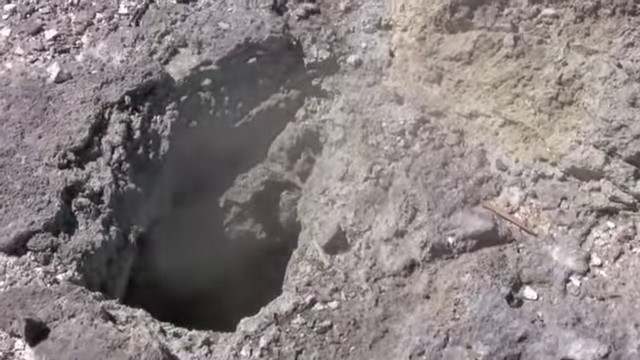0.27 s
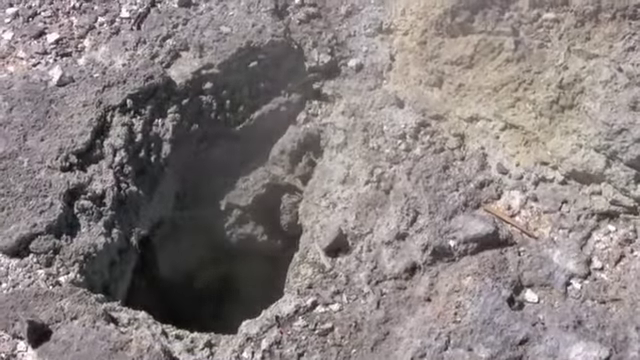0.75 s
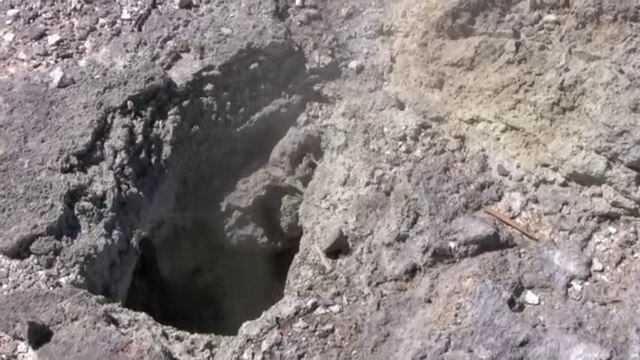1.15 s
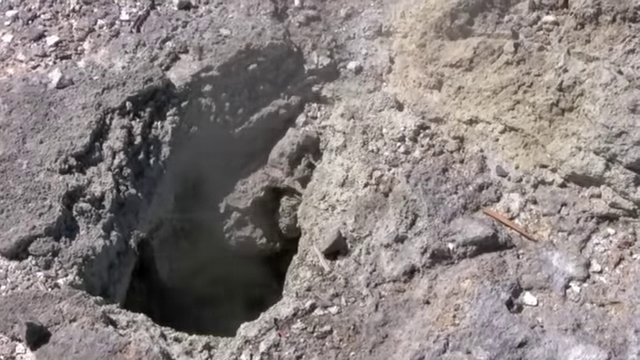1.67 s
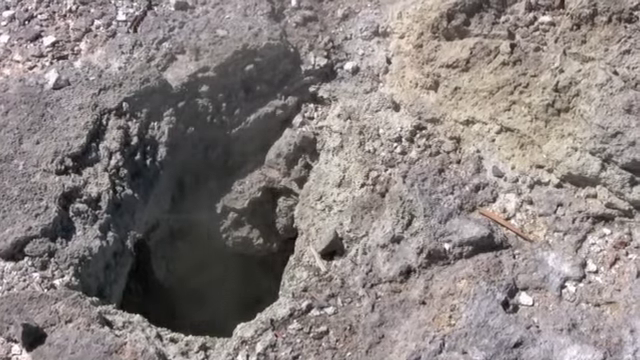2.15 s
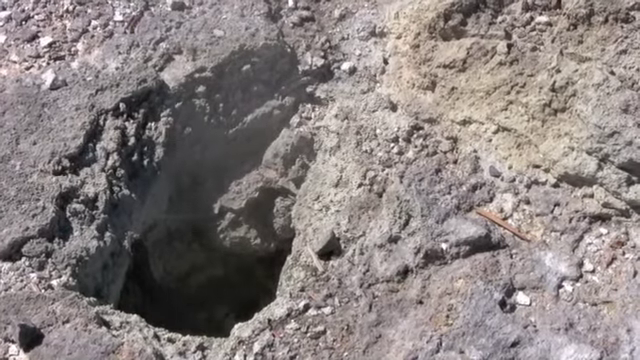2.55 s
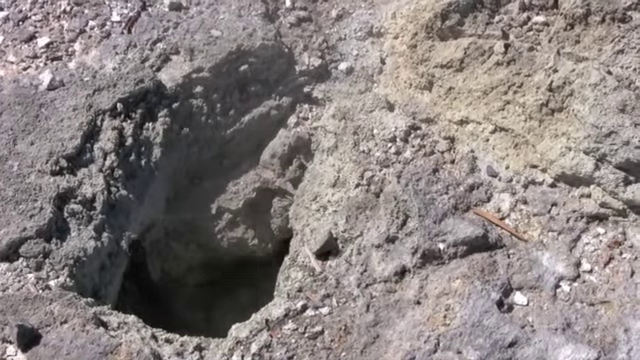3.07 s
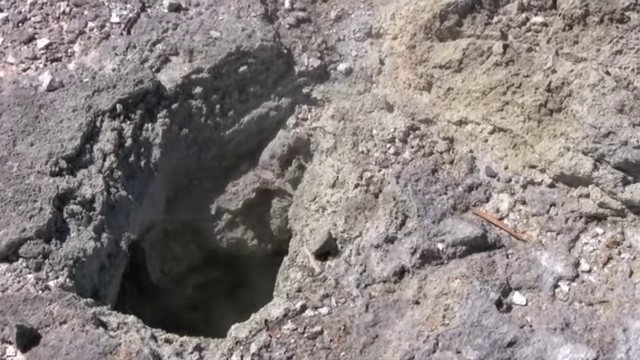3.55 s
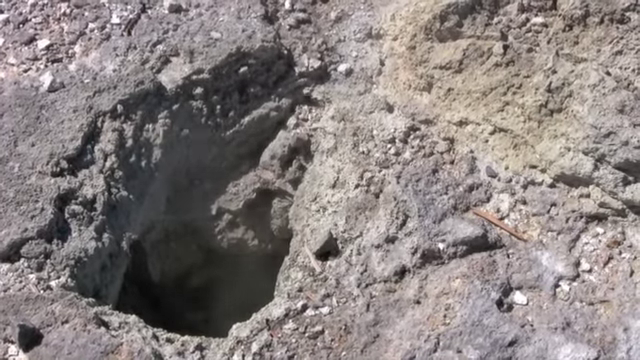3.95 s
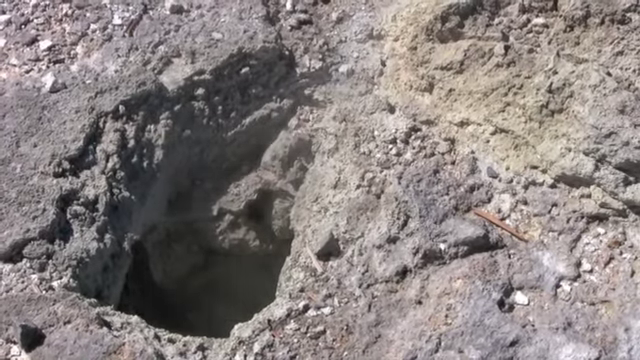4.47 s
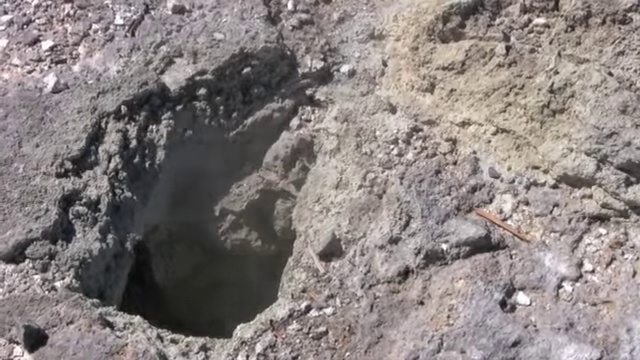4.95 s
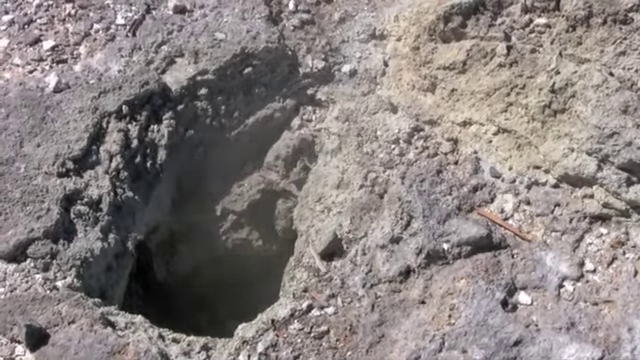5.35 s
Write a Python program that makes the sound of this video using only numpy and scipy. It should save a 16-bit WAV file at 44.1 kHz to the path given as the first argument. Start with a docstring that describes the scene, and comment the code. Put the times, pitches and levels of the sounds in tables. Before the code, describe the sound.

Hot muddy water boils deep in a small ground vent, with irregular hollow plops, low gulps and tiny wet pops over a soft simmer.

```python
"""At the rim of a small geothermal vent outdoors, hot muddy water is heard boiling at the bottom.
Gas pockets gulp and whoop, made of swelling sine tones; bubbles plop and pop in clusters with froth and drops.
Splashes throw noisy spray; many small bubbles simmer over a deep blur, under a faint hiss of filtered noise.
The throat rings and the rock echoes; the camera adds a knock, a thin whine and short lens motor buzzes."""
import sys
import numpy as np
from scipy import signal
from scipy.fft import rfft, irfft
from scipy.io import wavfile
from scipy.ndimage import uniform_filter1d

SR = 44100
rng = np.random.default_rng(int(sys.argv[2]) if len(sys.argv) > 2 else 0)


def file_out(sig):
    """Save sig as 16-bit WAV at sys.argv[1]."""
    # one column per channel
    cols = np.atleast_2d(sig).T
    # limit, then scale
    lim = np.clip(cols, -1, 1)
    pcm = np.round(lim * 32767).astype(np.int16)
    wavfile.write(sys.argv[1], SR, pcm)


N = 247401
TIME = np.arange(N) / SR


def gain_of(db):
    """Turns decibels into amplitude."""
    return 10 ** (np.asarray(db) / 20)


def evened(x):
    """Scales a signal to an rms level of 1."""
    return x / np.sqrt(np.mean(x ** 2) + 1e-20)


def read_curve(points, hz):
    """Joins (pitch [Hz], value) points with straight lines on a log-frequency axis."""
    f, value = np.transpose(points)
    return np.interp(np.log(hz + 1), np.log(f + 1), value)


def add(mix, s, sound):
    """Mixes a sound in, starting at time s."""
    part = mix[max(0, round(s * SR)):][:len(sound)]
    part += sound[:len(part)]


def bubble(hz, swell, glide, delay=0):
    """A pocket of gas rings for a few cycles, swelling and dying; its pitch climbs as it surfaces."""
    t = np.maximum(np.arange(int(8 * swell * SR) + 2) / SR - delay, 0)
    u = t / swell  # 1 at the loudest moment, where the pitch is exactly hz
    envelope = (u * np.exp(1 - u)) ** 2
    return envelope * np.sin(2 * np.pi * hz * t * (1 + glide * (u - 2)))


def bubbles(rows, glide):
    """Plays bubbles given as (time [s], level [dB], pitch [Hz], swell time [s])."""
    out = np.zeros(N)
    for s, db, hz, swell in rows:
        start = np.floor(s * SR) / SR
        delay = s - start  # the part of a sample left over
        add(out, start, gain_of(db) * bubble(hz, max(swell, 10 / SR), glide, delay))
    return out


def swarm(per_s, low_hz, high_hz, cycles, spread_db, tilt_db=0, count=40):
    """Countless bubbles of many sizes, each size arriving at random; tilt in dB per octave."""
    out = np.zeros(N)
    for hz in np.geomspace(low_hz, high_hz, count):
        chance, size = rng.random(N), rng.standard_normal(N)
        swell = cycles * rng.uniform(0.22, 1.87) / hz
        ring = gain_of(tilt_db * np.log2(hz / low_hz)) * bubble(hz, swell, 0.012)
        for k in np.flatnonzero(chance < per_s / count / SR):
            add(out, k / SR, gain_of(spread_db * min(size[k], 2)) * ring)
    return evened(out)


def noise(colour, likeness, patchy_db):
    """Stereo noise: random waves shaped by a colour curve, with patches that drift in time and pitch."""
    hz = np.fft.rfftfreq(2048, 1 / SR)
    a, b, c, d, patches = rng.standard_normal((5, len(hz), N // 512 + 5))
    patches = uniform_filter1d(patches, size=12, axis=0)
    patches = evened(uniform_filter1d(patches, size=4, axis=1))
    same = np.clip(read_curve(likeness, hz), -1, 1)[:, None]
    left = a + 1j * b
    right = same * left + np.sqrt(1 - same ** 2) * (c + 1j * d)
    spectrum = np.array([left, right])
    spectrum *= gain_of(read_curve(colour, hz)[:, None] + patchy_db * patches)
    return evened(signal.istft(spectrum, nperseg=2048, noverlap=1536)[1][:, :N])


# how hard the water boils, only lightly followed by the sound: (time [s], vigour [dB])
VIGOUR = [(0.0, -36.5), (0.94, -33), (1.05, -14), (1.4, -32), (2.08, -25.5), (3.05, -30.5), (3.5, -25),
          (3.88, -30), (4.97, -17), (5.61, -38.5)]


def boil_strength(follow=0.12):
    """The boil grows louder and softer by a small share of its vigour in dB."""
    s, db = np.transpose(VIGOUR)
    return gain_of(follow * np.interp(TIME, s, db - np.median(db)))


def simmer():
    """The steady boil: many small bubbles ring at random as low murmurs, plops and fizz."""
    murmur = gain_of(-53) * swarm(per_s=110, low_hz=142.3, high_hz=246, cycles=1.73, spread_db=1.0)
    bubbling = gain_of(-50) * swarm(per_s=300, low_hz=300, high_hz=680, cycles=1.3, spread_db=3.3)
    small = gain_of(-57) * swarm(per_s=400, low_hz=727, high_hz=1155, cycles=1.65, spread_db=2.5)
    fizz = gain_of(-63.5) * swarm(per_s=500, low_hz=1170, high_hz=2900, cycles=2.2, spread_db=3.5, tilt_db=-6)
    return murmur + bubbling + small + fizz


# tone of the deep blur: (pitch [Hz], relative level per Hz [dB])
WASH_COLOUR = [(15, -50), (28, -36), (40, -13), (80, -5), (130, -2), (190, 0), (280, -0.5), (470, -5.5),
               (750, -10), (1100, -12.5), (1500, -24.5), (2300, -27.5), (3500, -43.5), (8000, -47)]
# how alike the blur is at the two ears: (pitch [Hz], left-right correlation [-1 to 1])
WASH_LIKENESS = [(30, 0.34), (130, 0.62), (600, 0.76), (1400, 0.39), (3000, 0.46)]


def deep_wash():
    """Deep boiling blurs into low, patchy noise."""
    return gain_of(-44) * noise(WASH_COLOUR, WASH_LIKENESS, patchy_db=2.5)


# tone of the hiss: (pitch [Hz], relative level per Hz [dB])
HISS_COLOUR = [(300, -46), (1500, -7), (3500, 6.5), (5000, 2.5), (6200, 5), (8500, 2.5), (9400, 6),
               (10200, 2), (12000, 4.5), (14000, -14), (16000, -42)]
# how alike the hiss is at the two ears: (pitch [Hz], left-right correlation [-1 to 1])
HISS_LIKENESS = [(1500, -0.32), (3500, 0.3), (6000, 0.36), (9000, -0.3), (15000, -0.62)]


def faint_hiss():
    """A faint, patchy hiss of noise lies over the boil, slightly louder on the right."""
    return gain_of(-61) * noise(HISS_COLOUR, HISS_LIKENESS, patchy_db=3.0) * gain_of([[-.7], [.7]])


# short spells of the lens motor: (time at the centre [s], half length [s])
MOTOR_SPELLS = [(.05, .068), (.9, .03), (1.323, .03), (2.11, .1), (2.65, .04), (3.197, .045), (4.177, .074),
                (5.3, .08)]
# how strongly the motor buzzes at each pitch: (pitch [Hz], relative level [dB])
MOTOR_COLOUR = [(3500, -18), (4200, -9), (4700, 2), (5100, -20), (5400, -30), (6000, -0.5), (6300, -2),
                (6800, -42), (7800, -7), (9000, -20), (11200, -15), (12500, -27)]


def lens_motor(level_db=-66, step_hz=300):
    """A stepping motor buzzes on whole multiples of its step rate, in short smooth-edged spells."""
    buzz = np.zeros(N)
    for hz in np.arange(12, 41) * step_hz:
        buzz += gain_of(read_curve(MOTOR_COLOUR, hz)) * np.sin(2 * np.pi * (hz * TIME + rng.random()))
    running = np.zeros(N)
    for s, half in MOTOR_SPELLS:
        running += 1 / (1 + ((TIME - s) / half) ** 8)
    return gain_of(level_db) * running * evened(buzz) * np.ones((2, 1))


# thin tones of the camera: (pitch [Hz], rms level [dB], phase of left ahead of right [radians])
WHINE_TONES = [(3585, -79, .5), (4490, -83, 1), (4680, -80, 1.8), (4800, -80, 2), (5243, -81, 1),
               (5383, -79, 1), (6002, -83, 1), (7187, -84, 1), (9265, -80, 2.2), (9362, -74, 2.3),
               (9458, -79, 2.4), (10550, -81, 2.8), (11700, -81, 2.8)]


def camera_whine(waver_hz=4):
    """Faint steady tones waver slightly in pitch, at a different phase in each ear."""
    out = np.zeros((2, N))
    for hz, db, phase in WHINE_TONES:
        waver = waver_hz * evened(uniform_filter1d(rng.standard_normal(N), size=2000))
        turns = np.cumsum(hz + waver) / SR
        out += gain_of(db) * np.sqrt(2) * np.sin(2 * np.pi * turns + np.array([[phase], [0]]))
    return out


# bubbles opening at the surface, alone or in quick clusters:
# (time [s], level before the mix [dB], pitch [Hz], swell time [s])
PLOP_BUBBLES = [(.087, -33.5, 404, 0.0031), (0.4137, -23, 443, 0.0017), (.423, -38, 630, 0.0053),
                (0.4377, -24, 630, 0.003), (0.45, -27, 427, 0.0017), (.461, -27, 557, 0.0021),
                (0.4696, -13.5, 566, 0.0042), (.472, -20.5, 785, 0.0027), (.478, -13.5, 616, 0.0016),
                (.481, -20, 850, 0.0026), (.5207, -31, 463, 0.0015), (0.6482, -31.5, 544, 0.0026),
                (0.7107, -33.5, 790, 0.0016), (.831, -35.5, 620, 0.0026), (0.8778, -28, 550, 0.0011),
                (1.041, -40, 1070, 0.0016), (1.0865, -28, 560, 0.0031), (1.096, -29, 930, 0.0013),
                (1.11, -31, 810, 0.001), (1.347, -28.5, 345, 0.0041), (1.361, -40, 630, 0.0059),
                (1.721, -32.5, 536, 0.0024), (1.7474, -17.5, 640, 0.002), (1.761, -21.5, 560, 0.0032),
                (1.918, -30, 516, 0.0027), (1.945, -24, 475, 0.0018), (1.9605, -22.5, 610, 0.0032),
                (1.968, -20.5, 392, 0.0044), (1.969, -35, 870, 0.0024), (1.984, -28, 460, 0.0024),
                (1.994, -16.5, 520, 0.0025), (1.999, -32, 750, 0.0018), (2.006, -21, 566, 0.003),
                (2.0138, -16.5, 610, 0.0026), (2.021, -39, 720, .002), (2.039, -31, 550, 0.00083),
                (2.143, -35, 680, 0.0018), (2.306, -32, 550, 0.0022), (2.546, -23, 590, 0.002),
                (2.557, -24, 610, 0.0025), (2.556, -40, 837, 0.0063), (3.267, -26.5, 343, 0.0052),
                (3.268, -36, 830, .0015), (3.277, -25, 516, 0.0033), (3.291, -32, 554, 0.0042),
                (3.2972, -21, 560, 0.0016), (3.305, -26, 590, 0.0014), (3.332, -29.5, 490, 0.0016),
                (3.472, -27, 419, 0.0058), (3.4755, -31, 706, 0.0022), (3.483, -25.5, 605, 0.0026),
                (3.4997, -20, 580, 0.0026), (3.5195, -30.5, 634, 0.0021), (3.5448, -26.5, 770, 0.00077),
                (3.578, -37.5, 644, 0.0032), (4.089, -38.5, 1090, 0.0021), (4.1241, -24.5, 358, 0.0024),
                (4.281, -24, 483, 0.0025), (4.7324, -35, 620, 0.003), (4.7971, -26, 656, 0.002),
                (4.871, -24.5, 584, .004), (4.88, -25.5, 633, 0.0045), (4.8961, -17, 470, 0.0024),
                (4.8975, -17.5, 645, 0.0059), (4.903, -17.5, 361, 0.0033), (4.905, -17.5, 750, 0.0023),
                (4.9135, -13, 516, 0.0025), (4.924, -22, 565, 0.0038), (4.929, -24, 820, 0.0031),
                (4.937, -30.5, 1045, 0.0037), (4.948, -23.5, 806, 0.0024), (4.96, -21.5, 567, 0.00092),
                (4.965, -39, 786, 0.0017), (5.025, -30.5, 520, 0.0038), (5.0518, -27, 417, 0.0012),
                (5.147, -34.5, 464, 0.0054)]


def plopping(overtone=1.2, overtone_db=-14):
    """Each opening bubble sounds its pitch and one weaker, higher partial."""
    overtones = [(s, db + overtone_db, hz * overtone, swell) for s, db, hz, swell in PLOP_BUBBLES]
    return bubbles(PLOP_BUBBLES + overtones, glide=0.0061)


def froth(bursts, level_db=-20, settle_s=0.024):
    """Each burst tears off smaller bubbles, which die away just after it."""
    keep = np.exp(-1 / (settle_s * SR))
    stir = np.sqrt(signal.lfilter([1 - keep], [1, -keep], bursts ** 2))  # loudness that lingers
    return gain_of(level_db) * stir * swarm(per_s=560, low_hz=404, high_hz=1294, cycles=7.2, spread_db=2.5)


# large gas pockets swelling under the surface: (time [s], level [dB], pitch [Hz], swell time [s])
GULP_POCKETS = [(.1057, -30.5, 236, 0.0054), (.392, -24.5, 201, 0.0085), (.416, -25, 180.4, 0.014),
                (.436, -19.5, 204, 0.0037), (.447, -19, 191.3, 0.0085), (.47, -26, 225, 0.0024),
                (.49, -23.5, 227, 0.0032), (.52, -32.5, 162, 0.0096), (.85, -31.5, 225, 0.0035),
                (1.044, -27, 175, 0.011), (1.096, -29, 198, 0.0083), (1.7088, -26.5, 190, 0.0033),
                (1.748, -29.5, 220, 0.012), (1.942, -14, 165, .0047), (1.959, -20, 185, 0.0043),
                (1.975, -20, 211, 0.0077), (1.992, -30, 210, .006), (2.038, -29, 186, 0.0045),
                (2.267, -28, 210, 0.0052), (2.553, -30, 180, 0.0079), (2.741, -24.5, 193, 0.0068),
                (2.828, -26.5, 260, 0.0021), (2.952, -32.5, 204, 0.011), (3.166, -28, 190, 0.0032),
                (3.2048, -28, 215, 0.0072), (3.266, -21.5, 201, 0.011), (3.287, -29.5, 170, 0.01),
                (3.47, -19, 210, 0.0049), (3.518, -31, 195, 0.011), (3.541, -24.5, 197, 0.0094),
                (4.219, -32, 185, 0.0065), (4.2537, -25, 188, 0.0078), (4.551, -28.5, 178, 0.0078),
                (4.616, -33.5, 207, 0.01), (4.6365, -26, 208, 0.0044), (4.875, -25.5, 182, 0.011),
                (4.896, -13, 205.5, 0.0063), (4.912, -20, 213, 0.0039), (4.924, -26.5, 172, 0.011),
                (4.954, -26, 177, 0.0089), (5.021, -29.5, 225, 0.0062), (5.049, -33, 190.5, 0.012),
                (5.588, -24.5, 210, 0.0086)]


def gulping(shove_db=-8, shove_hz=220, shove_swell_s=0.0034):
    """Low gulps: pockets on their own, and a soft one where each plop shoves the gas beneath it."""
    shoved = []
    for s, db, *_ in PLOP_BUBBLES:
        hz = shove_hz * rng.uniform(0.49, 1.62)
        shoved.append((s, db + shove_db, hz, shove_swell_s))
    return bubbles(GULP_POCKETS + shoved, glide=0.0026)


# air tones of the vent's throat: (pitch [Hz], relative level [dB], time to fade by 60 dB [s])
THROAT_MODES = [(201, 5, 0.099), (370, -3, 0.045), (522, 1, 0.065), (660, -6, 0.05), (855, -5, 0.08),
                (1130, -10, 0.04)]


def throat(x, ring_db=-13):
    """The air in the hole rings on after each bubble, on a few fading tones."""
    t = np.arange(SR // 4) / SR
    ring = np.zeros(len(t))
    for hz, db, t60 in THROAT_MODES:
        ring += gain_of(db - 60 * t / t60) * np.sin(2 * np.pi * hz * t)
    ring /= abs(rfft(ring)).max()  # the strongest tone has a gain of 1
    return gain_of(ring_db) * signal.oaconvolve(x, ring)[:N]


def walls(x, t60):
    """Quick scattered echoes from the rough rock; they all leave by the one opening."""
    t = np.arange(SR // 5) / SR
    bounces = rng.standard_normal(len(t)) * (rng.random(len(t)) < .1) * (t > .002)
    taps = bounces * gain_of(-60 * t / t60)
    return signal.oaconvolve(x, taps / np.linalg.norm(taps))[:N]


# ringing tones of a light knock on the camera body:
# (pitch [Hz], level before rise and panning [dB], time to fade by 60 dB [s], left minus right [dB])
KNOCK_TONES = [(1130, -10.5, 0.016, 6), (1260, -19, 0.01, -15), (1820, -20, 0.0089, -2),
               (2150, -21, 0.0099, -11), (2930, -29, 0.014, -6), (3300, -48, 0.06, 4),
               (2400, -33.5, 0.082, -12), (2480, -27, 0.0042, -9), (4080, -24.5, 0.0071, -2),
               (4370, -27.5, 0.0076, -7), (6750, -32, 0.0058, -6), (10200, -25.5, 0.0038, -5),
               (13000, -35, .004, 0)]


def knock(at_s=.4211, rise_s=0.00071):
    """A hard tick rings the casing, unequally at the two microphones."""
    out, t = np.zeros((2, N)), np.arange(SR // 6) / SR
    for hz, db, t60, pan_db in KNOCK_TONES:
        for ear, side in zip(out, (1, -1)):
            level = gain_of(db + side * pan_db / 2 - 60 * t / t60) * (1 - np.exp(-t / rise_s))
            add(ear, at_s, level * np.sin(2 * np.pi * hz * t + side * 0.61))
    return out


# snapping films and landing droplets: (time [s], level before the mix [dB], pitch [Hz], swell time [s])
POP_BUBBLES = [(0.49, -33, 1430, 0.00046), (0.4926, -27.5, 1640, 0.0012), (.49, -49, 3930, 0.0016),
               (.498, -32, 2470, .0012), (0.7108, -29, 2020, 0.00062), (.773, -40.5, 2290, 0.001),
               (.8784, -42.5, 2150, 0.00097), (1.0977, -21.5, 2060, 0.00098), (1.099, -24.5, 1170, .001),
               (1.0995, -48, 3000, 0.0011), (1.202, -41, 2310, 0.00095), (1.474, -32, 2190, 0.00056),
               (1.5468, -34.5, 2380, 0.00052), (1.737, -36, 1650, 0.0011), (1.9185, -45, 2350, 0.00093),
               (1.932, -45, 3600, .0015), (1.9327, -45, 2300, 0.0011), (1.94, -43, 3420, 0.002),
               (1.9414, -34.5, 2317, 0.00066), (1.963, -25, 1180, 0.00087), (1.97, -33, 1180, 0.0023),
               (1.994, -42, 1480, .001), (2.015, -44, 3500, 0.0011), (2.016, -46, 2750, .0017),
               (2.317, -26.5, 2040, 0.0003), (2.559, -30, 3000, 0.00094), (2.5815, -35, 1700, 0.00034),
               (2.705, -38.5, 2410, 0.00071), (3.267, -31, 2280, 0.0019), (3.272, -39, 3560, 0.0011),
               (3.28, -27.5, 2130, 0.0017), (3.3, -30.5, 1960, 0.0011), (3.301, -37.5, 3200, 0.00073),
               (3.3855, -37, 1848, 0.00062), (3.3966, -25.5, 1478, 0.00033), (3.475, -35, 1720, 0.0028),
               (3.479, -36.5, 2040, 0.0023), (3.487, -37, 3850, 0.0011), (3.522, -44, 1760, 0.0047),
               (3.526, -37, 3800, 0.00042), (3.547, -45, 1380, 0.00077), (3.59, -34, 1100, 0.0018),
               (3.602, -30, 1120, 0.0016), (4.941, -30.5, 2050, 0.00093), (4.949, -33.5, 2290, 0.0013),
               (4.945, -28, 1310, 0.0011), (4.981, -41, 2260, .001), (5.048, -29.5, 1640, .0016),
               (5.048, -36, 2400, 0.001), (5.1125, -32, 2616, 0.00025), (5.2004, -37.5, 2780, 0.00068),
               (5.215, -41, 2650, .0009)]
# splashes as clusters of bubbles burst: (time at the centre [s], half length [s], level before the mix [dB])
SPLASH_BURSTS = [(.434, 0.0073, -47), (0.479, 0.0077, -40), (0.497, 0.0072, -37), (1.12, 0.012, -58),
                 (1.766, 0.0085, -41.5), (1.966, 0.0076, -43.5), (1.992, 0.0075, -43), (2.01, 0.0073, -52),
                 (2.04, .005, -47), (3.281, 0.0097, -46), (3.303, 0.0066, -42), (3.481, 0.0064, -44),
                 (3.51, .008, -47), (3.527, 0.01, -43), (3.56, .01, -50), (3.594, 0.014, -49),
                 (4.904, 0.011, -41.5), (4.947, .014, -34), (4.956, 0.0084, -40), (4.99, .008, -49),
                 (5.055, .005, -44)]


def popping(low_hz=1014, high_hz=4430, swell_cycles=1.53, per_s=1500):
    """Films snap, and every splash flings ringing droplets; the higher ones tend to be fainter."""
    level_db, tilt_db, scatter_db = -2.5, -3.5, 3.5  # over the spray; per octave; random spread
    droplets = []
    for s, half, db in SPLASH_BURSTS:
        for _ in range(min(64, round(2 * half * per_s))):
            when, loud = rng.standard_normal(2)
            hz = low_hz * (high_hz / low_hz) ** rng.random()
            level = db + level_db + tilt_db * np.log2(hz / low_hz) + scatter_db * loud
            droplets.append((s + when * half / np.sqrt(2), level, hz, swell_cycles / hz))
    return bubbles(POP_BUBBLES + droplets, glide=0.012)


# thin spits of steam: (time at the centre [s], level before the mix [dB], brightness [dB per octave])
STEAM_SPITS = [(.712, -51, 2), (1.1005, -41, -11), (2.319, -52, 4), (3.299, -47, -6), (3.488, -40.5, -3),
               (3.527, -42.5, -2), (3.713, -42.5, -0.5), (4.345, -51, 0), (4.386, -43, 0.5),
               (4.958, -42.5, 21), (4.97, -43.5, 18)]


def showers():
    """Spray from splashes, pops and steam: (time [s], level [dB], half length [s], dB per octave)."""
    thrown = [(s, db, half, -4) for s, half, db in SPLASH_BURSTS]
    puffed = [(s + swell, db - 34, 0.0048, -4) for s, db, _, swell in POP_BUBBLES]
    spat = [(s, db, 0.0028, bright) for s, db, bright in STEAM_SPITS]
    return thrown + puffed + spat


# tone of the spray before each shower's own slope: (pitch [Hz], relative level [dB])
SPRAY_TONE = [(500, -9.5), (1200, -21), (2100, -7), (3000, -5), (4200, -3), (5500, -5.5), (7500, -3.5),
              (11000, -20), (16000, -41)]


def spray(grain_db=4, size=8192):
    """A torn film scatters into a short shower of tiny ticks: uneven noise that swells and fades."""
    out, hz = np.zeros(N), np.fft.rfftfreq(size, 1 / SR)
    t = (np.arange(size) - size / 2) / SR
    for s, db, half, bright in showers():
        ticks = evened(rng.standard_normal(size) * gain_of(grain_db * rng.standard_normal(size)))
        colour = evened(gain_of(read_curve(SPRAY_TONE, hz) + bright * np.log2(hz + 1)))
        shower = irfft(rfft(ticks * np.exp(-(t / half) ** 2)) * colour)
        add(out, s + t[0], gain_of(db) * shower)
    return out


# bubbles that whoop upward in pitch:
# (time [s], level [dB], first pitch [Hz], last pitch [Hz], swell time [s], length [s])
WHOOP_BUBBLES = [(1.319, -21.5, 173.5, 795, 0.011, 0.089), (1.888, -26, 165, 490, 0.01, 0.035),
                 (2.518, -26.5, 147, 623, 0.012, 0.0288), (4.098, -22.5, 169, 520, 0.009, 0.039)]


def whooping(bend=1.64):
    """A bubble rises through the last of the mud, and its note climbs as the layer above it thins."""
    out = np.zeros(N)
    for s, db, first_hz, last_hz, swell, length in WHOOP_BUBBLES:
        t = np.arange(0, length, 1 / SR)
        hz = first_hz * (last_hz / first_hz) ** ((t / length) ** bend)  # slowly at first, then fast
        level = (t / swell * np.exp(1 - t / swell)) ** 2 * (1 - (t / length) ** 10)
        add(out, s, gain_of(db) * level * np.sin(2 * np.pi * np.cumsum(hz) / SR))
    return out


# tiny trapped bubbles that ring on:
# (time [s], level before the soft rise [dB], pitch [Hz], time to fade by 60 dB [s])
DRIP_BUBBLES = [(1.3455, -37, 2085, .045), (2.558, -34, 2900, .022), (2.56, -39, 3500, .024),
                (3.27, -35, 2290, .03), (3.271, -41, 4030, .03), (3.281, -36, 2090, .034),
                (3.295, -49, 4100, .04), (4.939, -47, 3480, .09)]


def drips(rise_s=0.001):
    """Small bubbles pinch off under water and ring on one pitch."""
    out, t = np.zeros(N), np.arange(SR // 5) / SR
    for s, db, hz, t60 in DRIP_BUBBLES:
        level = gain_of(db - 60 * t / t60) * (1 - np.exp(-t / rise_s))
        add(out, s, level * np.sin(2 * np.pi * hz * t))
    return out


def scene():
    """The vent's bubbles sound from straight ahead, with the hiss and the small noises of the camera."""
    strength = boil_strength()
    wash = strength * deep_wash()
    gulps = gulping() + whooping()
    bursts = gain_of(2.5) * plopping()
    plops = bursts + froth(bursts) + strength * simmer()
    pops = gain_of(-5) * popping() + drips()
    mist = gain_of(-5) * spray()
    echoes = gain_of(-5) * walls(plops, t60=0.033)
    echoes += gain_of(-5) * walls(pops, t60=0.032)
    echoes += gain_of(-7) * walls(mist, t60=0.043)
    vent = gulps + plops + pops + mist + throat(plops + pops) + echoes
    camera = knock() + lens_motor() + camera_whine()
    return vent + wash + faint_hiss() + camera


def record(dry, low_cut_hz=36, edge_hz=15800):
    """The recorder's low cut removes rumble, and its band limit removes the highest treble."""
    low_cut = signal.butter(3, low_cut_hz, "high", fs=SR, output="sos")
    dry = signal.sosfilt(low_cut, dry)
    band_limit = signal.firwin(511, edge_hz, window=("kaiser", 9), fs=SR)
    return signal.oaconvolve(dry, band_limit[None], "same")


dry = scene()
out = record(dry)
file_out(out)
```